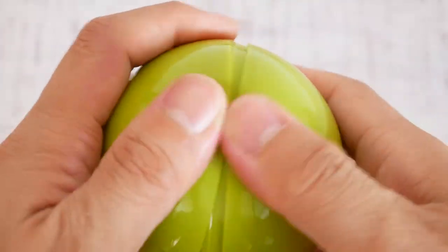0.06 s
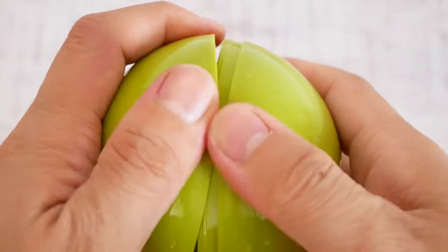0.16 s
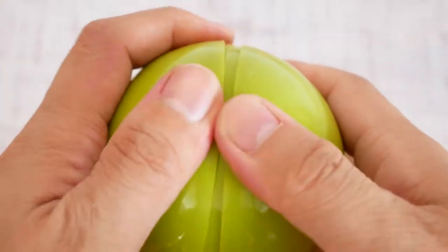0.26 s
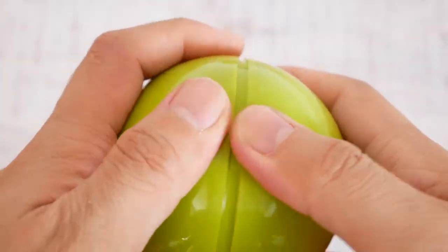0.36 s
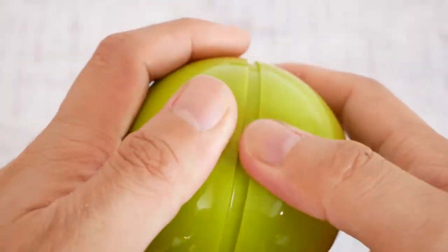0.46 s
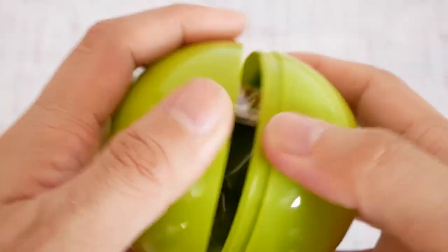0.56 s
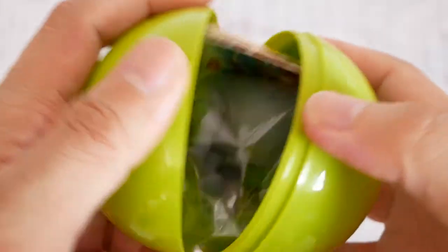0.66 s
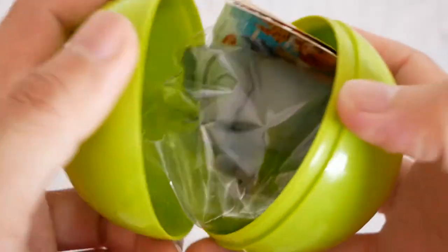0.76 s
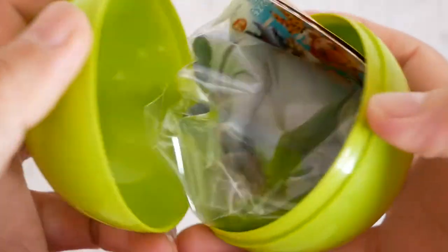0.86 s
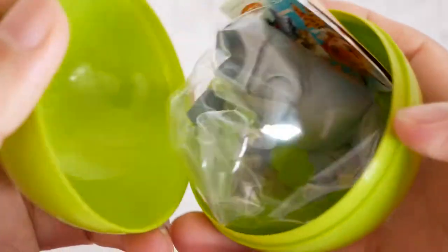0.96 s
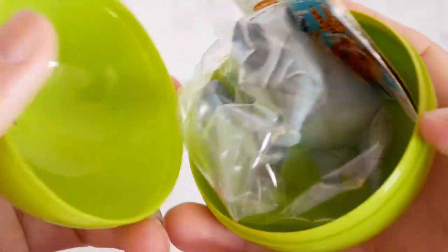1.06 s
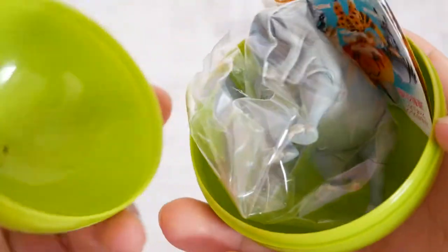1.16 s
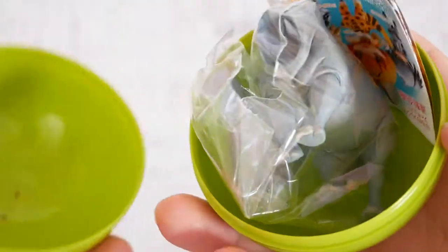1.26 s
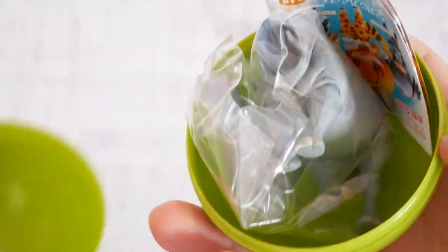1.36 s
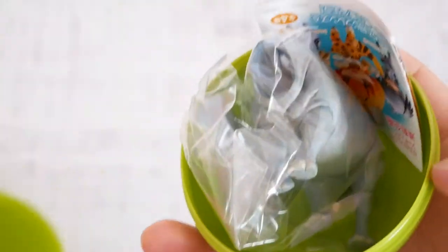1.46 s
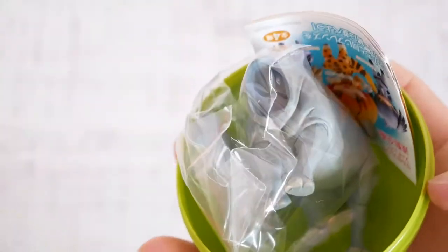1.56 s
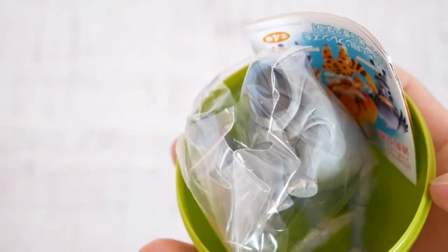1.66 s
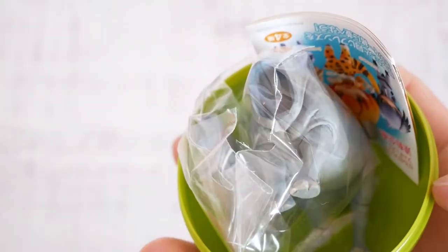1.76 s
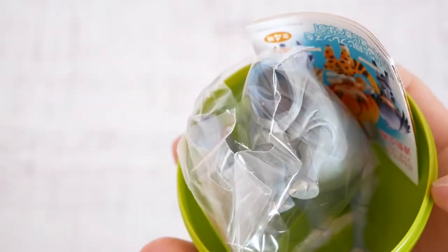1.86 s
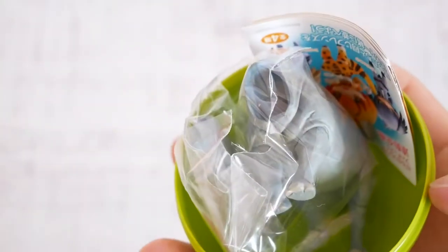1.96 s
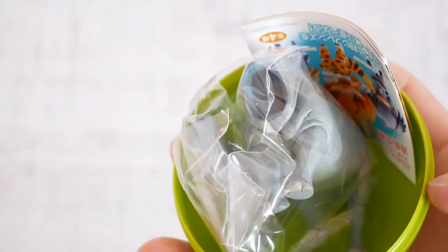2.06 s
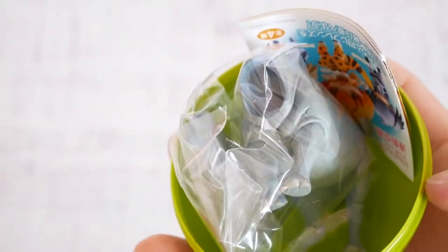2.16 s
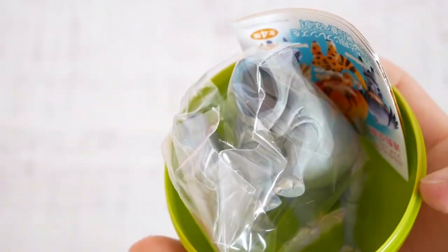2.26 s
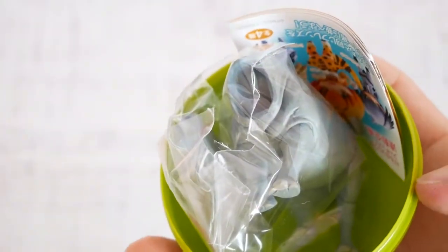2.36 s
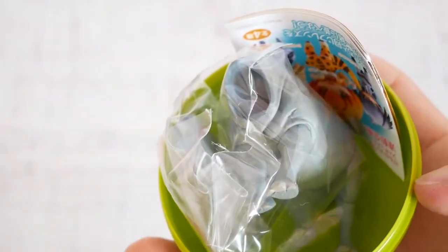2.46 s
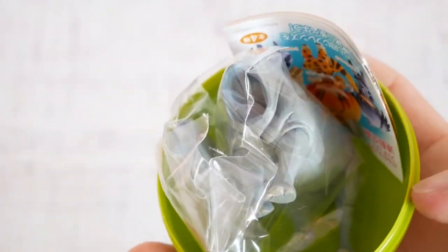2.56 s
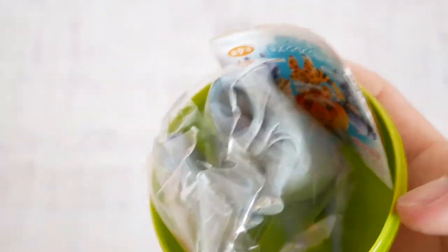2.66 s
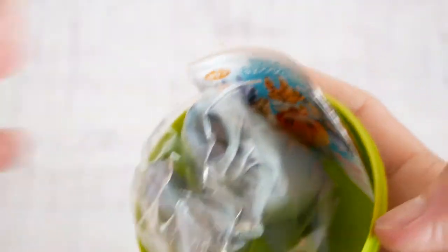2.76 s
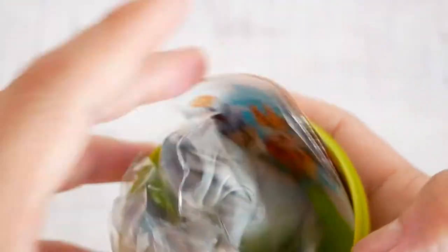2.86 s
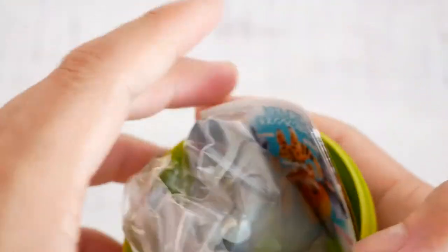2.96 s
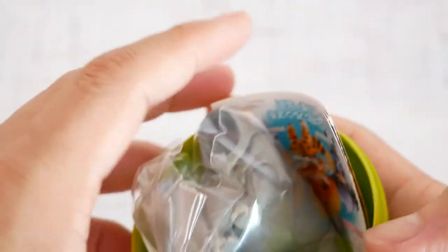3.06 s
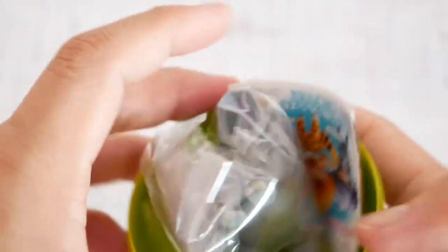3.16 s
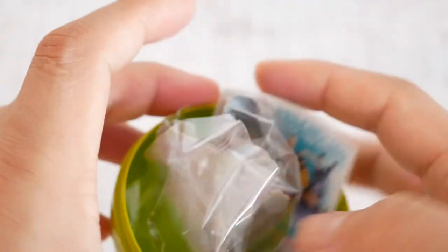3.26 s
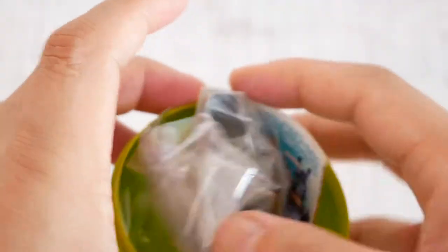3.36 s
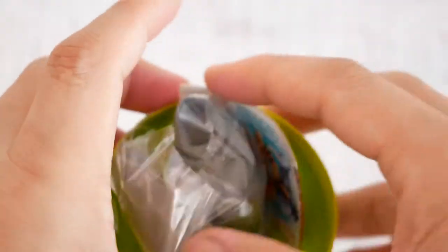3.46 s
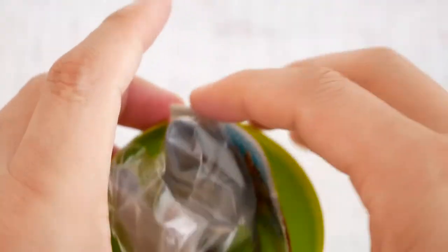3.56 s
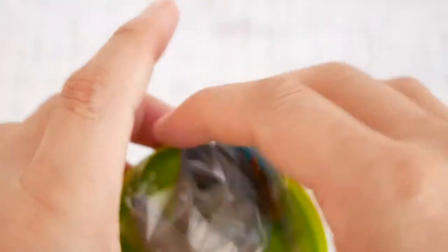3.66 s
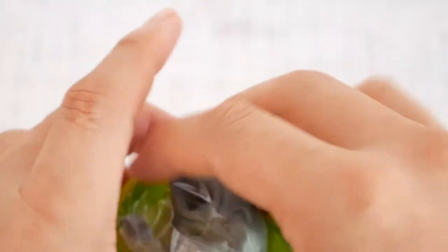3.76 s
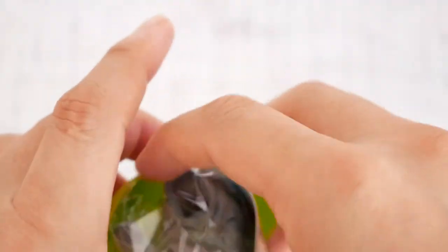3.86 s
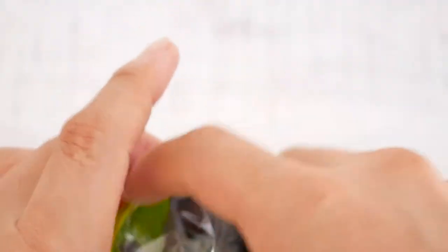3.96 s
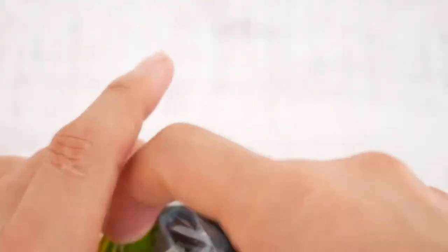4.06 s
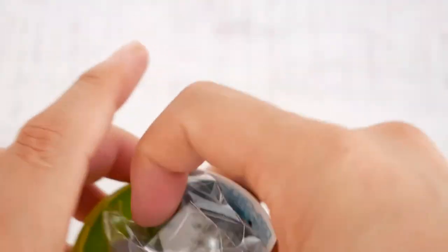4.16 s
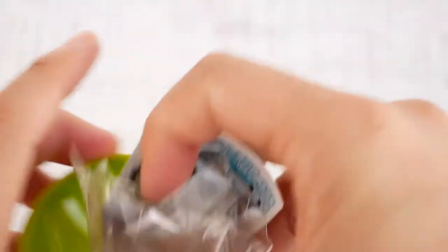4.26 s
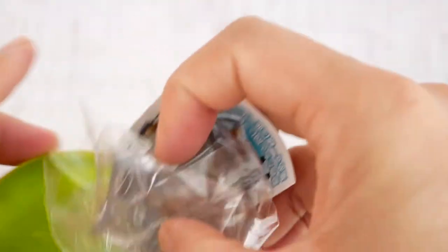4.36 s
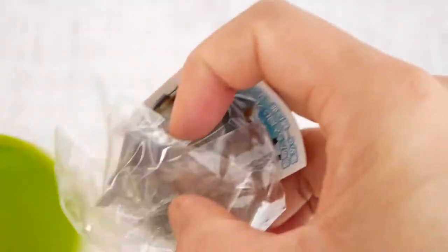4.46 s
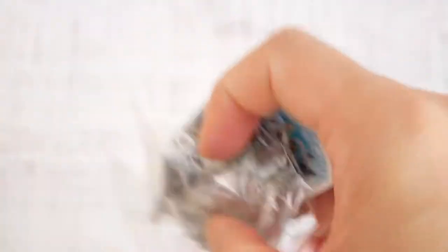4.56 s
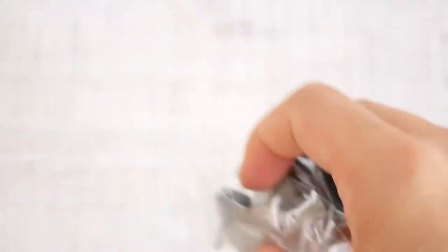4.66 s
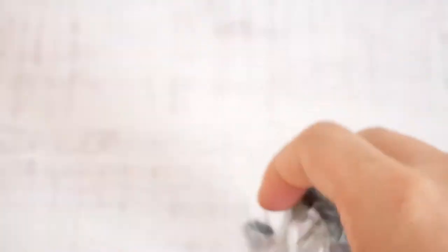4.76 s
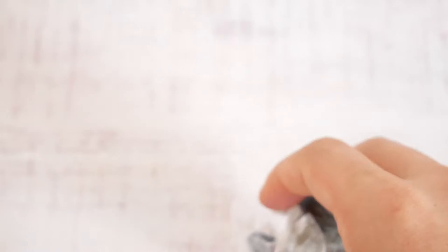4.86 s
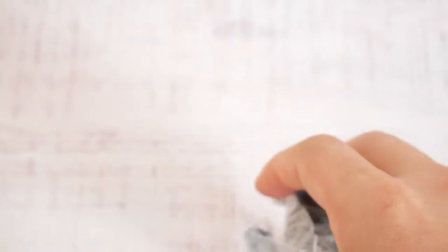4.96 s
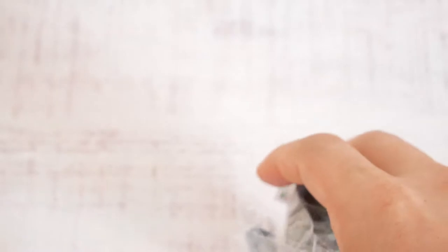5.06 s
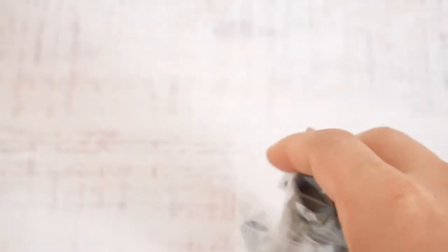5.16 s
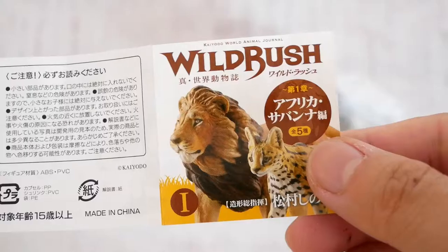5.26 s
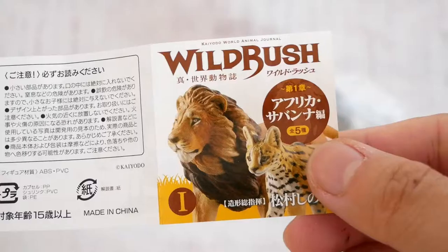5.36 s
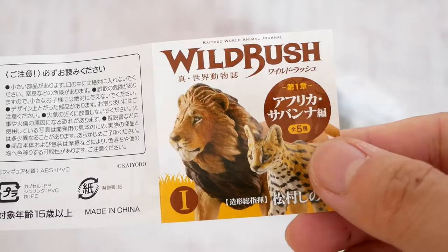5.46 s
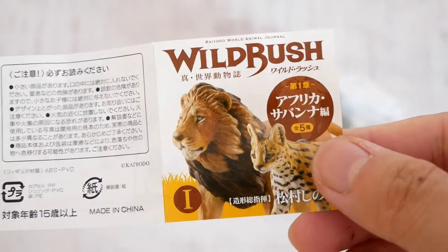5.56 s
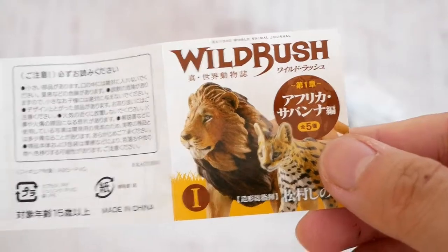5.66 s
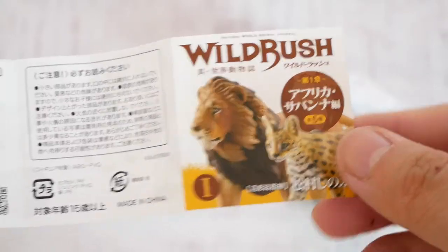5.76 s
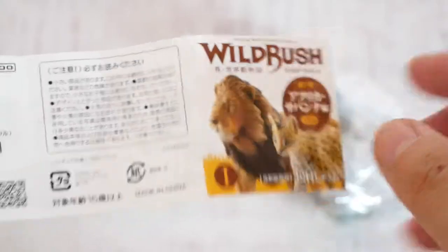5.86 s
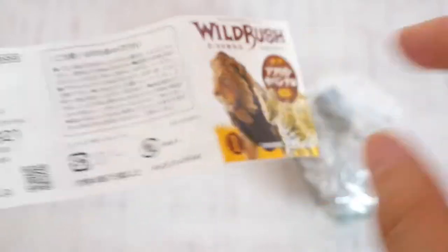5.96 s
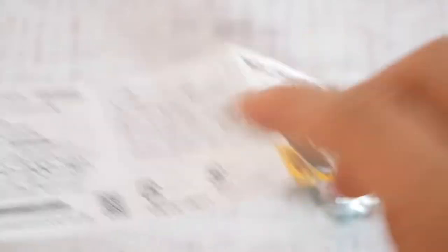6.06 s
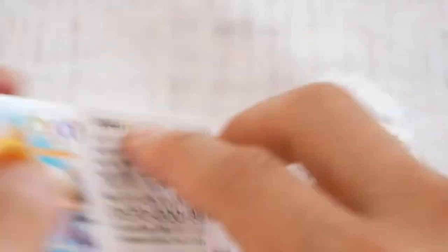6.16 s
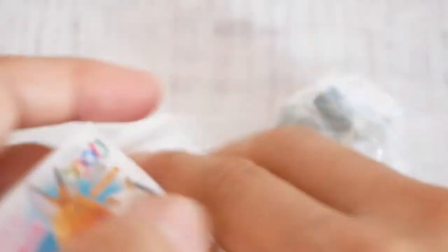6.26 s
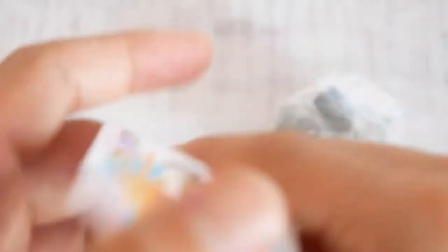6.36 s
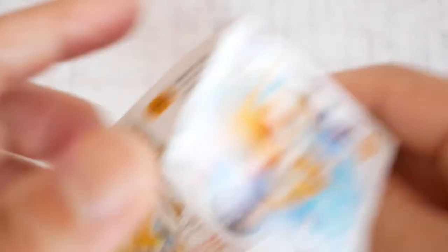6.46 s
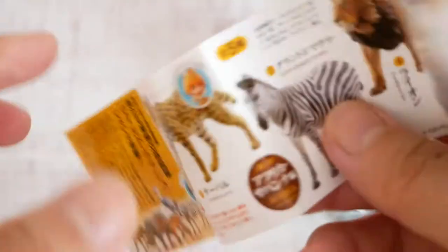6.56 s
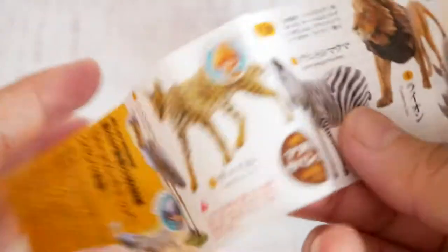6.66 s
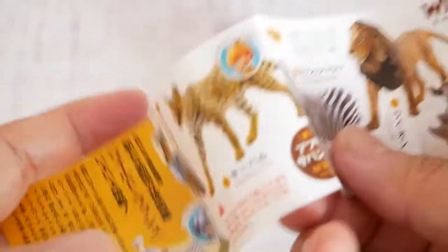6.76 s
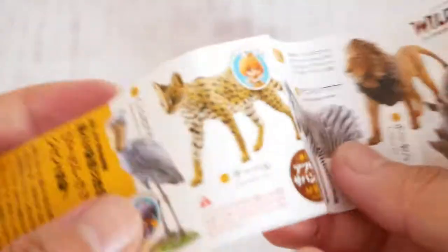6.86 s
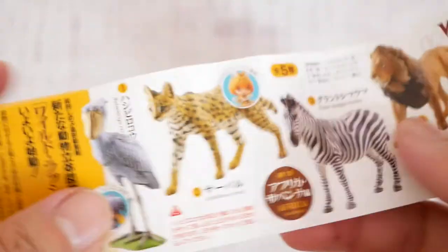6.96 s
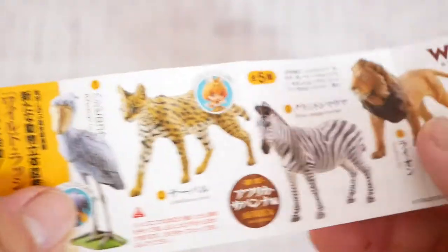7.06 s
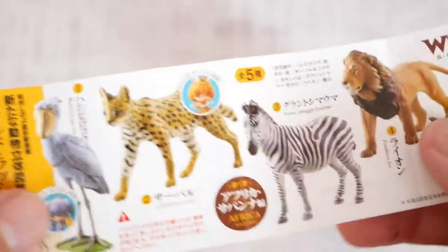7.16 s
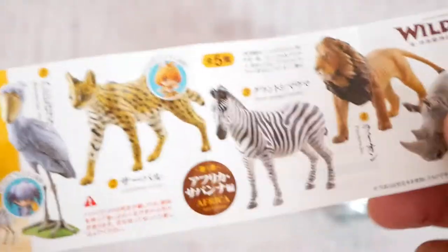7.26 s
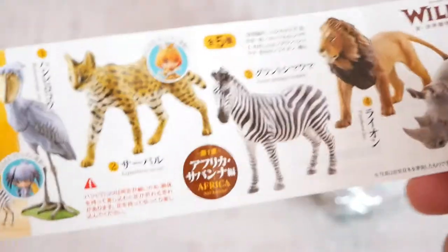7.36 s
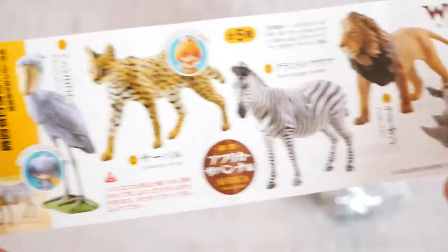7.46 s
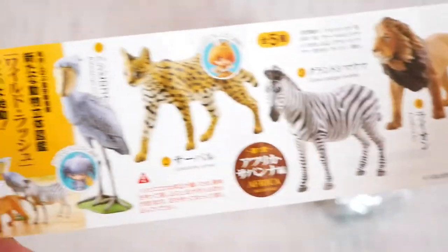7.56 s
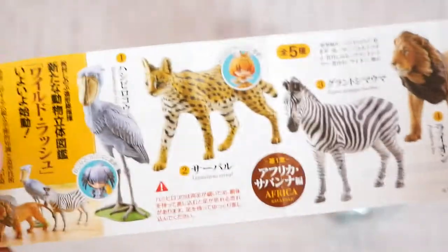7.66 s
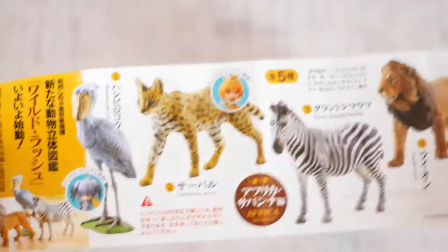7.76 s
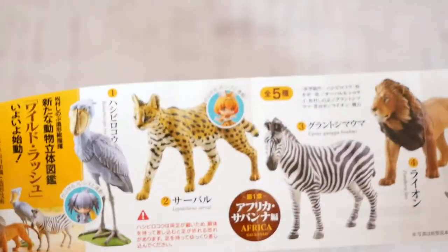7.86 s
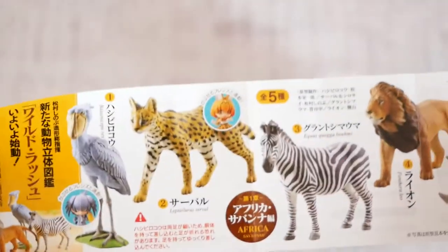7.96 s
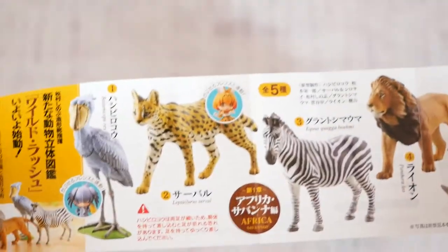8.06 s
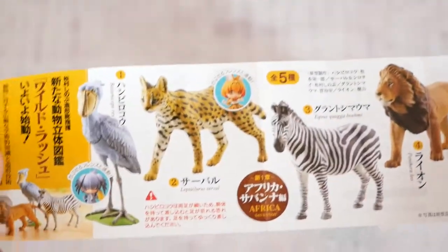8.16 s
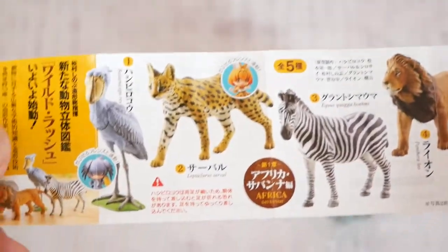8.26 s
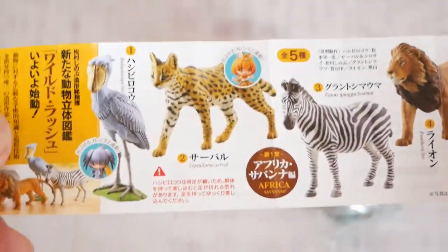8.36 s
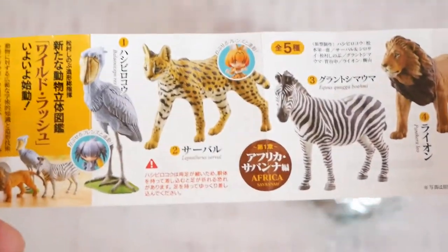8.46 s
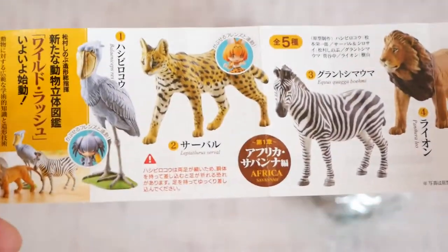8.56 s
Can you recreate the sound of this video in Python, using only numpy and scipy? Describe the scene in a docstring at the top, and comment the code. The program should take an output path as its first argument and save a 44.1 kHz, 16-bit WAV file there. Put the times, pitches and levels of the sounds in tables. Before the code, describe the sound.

Hollow plastic snaps and rattles, sharp bag crinkling that cuts off abruptly, then a glossy leaflet unfolding with crisp snaps in a humming small room.

```python
"""A plastic toy capsule is snapped open over a table and one half is put down, rattling; a hand slides by. A
bagged figure is pulled crinkling out of the other half and dropped; then the scene changes at once, room tail
included. After a short pause a folded paper leaflet is opened. A low hum, rumble and hiss run throughout. Blows
ring table modes, cracks and creases are filtered jolts, and friction is coloured random grains."""
import sys
import numpy as np
from scipy import signal
from scipy.fft import rfft, irfft, next_fast_len
from scipy.io import wavfile

SR = 44100
rng = np.random.default_rng(int(sys.argv[2]) if len(sys.argv) > 2 else 0)


def file_out(sig):
    """Save sig as 16-bit WAV at sys.argv[1]."""
    # one column per channel
    cols = np.atleast_2d(sig).T
    # limit, then scale
    lim = np.clip(cols, -1, 1)
    pcm = np.round(lim * 32767).astype(np.int16)
    wavfile.write(sys.argv[1], SR, pcm)


N = 378819
TIME = np.arange(N) / SR
JOLT_TIME = TIME[:1024]
CAPSULE_END_S = 5.254
CUTOFF_HZ = 15900


def from_db(db):
    """Decibels to amplitude gain."""
    return 10 ** (np.asarray(db) / 20)


def rms_one(x):
    """Scale to rms 1."""
    return x / np.sqrt(np.mean(x ** 2) + 1e-20)


def gain_curve(rows):
    """A (time, dB) curve as gain, silent outside its span."""
    s, db = np.transpose(rows)
    return from_db(np.interp(TIME, s, db)) * (TIME >= s[0]) * (TIME <= s[-1])


def at_hz(points, hz):
    """Read a two-column table along log frequency."""
    table_hz, values = np.array(points).T
    return np.interp(np.log(hz + 1e-3), np.log(table_hz), values)


def colour(x, spectrum):
    """Causal (minimum-phase) filter with the given (Hz, dB) spectrum."""
    size = 2 * next_fast_len(len(x))
    hz = np.arange(size // 2 + 1) * SR / size
    cepstrum = irfft(np.log(from_db(at_hz(spectrum, hz))))
    # fold the cepstrum onto positive time: minimum phase
    cepstrum[1:size // 2] *= 2
    cepstrum[size // 2 + 1:] = 0
    response = np.exp(rfft(cepstrum))
    return irfft(rfft(x, size) * response)[:len(x)]


def resonance(x, hz, width_hz):
    """Two-pole resonance with a peak gain near 1."""
    r = np.exp(-np.pi * width_hz / SR)
    numerator = np.array([1, 0, -1]) * (1 - r * r) / 2
    denominator = [1, -2 * r * np.cos(2 * np.pi * hz / SR), r * r]
    return signal.lfilter(numerator, denominator, x)


def drift(knots_per_s):
    """Slow random curve through evenly spaced knots; rms 1."""
    knots = rng.standard_normal(int(knots_per_s * N / SR) + 2)
    return rms_one(np.interp(TIME * knots_per_s, np.arange(len(knots)), knots))


def add(track, s, sound):
    """Lay a sound into a track at time s."""
    at = int(s * SR)
    track[at:at + len(sound)] += sound[:N - at]


def sized(x, db, seconds):
    """Give a pulse the energy of a sine of this peak level lasting so long."""
    return x * from_db(db) * np.sqrt(seconds * SR / 2 / np.sum(x ** 2))


def jolt(chatter, decay_s):
    """One sudden push and a brief chatter of tiny slips, its spectral ripple partly evened out."""
    push = chatter * rng.standard_normal(len(JOLT_TIME)) * np.exp(-JOLT_TIME / decay_s)
    push[0] = 1
    ripple_db = 20 * np.log10(np.abs(rfft(push))[1:] + .1)
    hz = np.arange(1, len(ripple_db) + 1) * SR / len(push)
    return colour(push, np.column_stack([hz, -.3 * ripple_db]))


def grains(per_s, spread_db, clump_db):
    """Random micro-slips of uneven size that come in clumps; rms 1."""
    sizes = from_db(spread_db * np.minimum(rng.exponential(1, N), 4)) * rng.standard_normal(N)
    occurs = rng.random(N) < per_s / SR
    return rms_one(sizes * occurs * from_db(clump_db * drift(70)))


def crinkle(per_s, low_hz, high_hz, spread_db, clump_db):
    """Tiny wrinkles flip at random, each ringing for a few cycles at one of 12 pitches; rms 1."""
    clicks = grains(per_s, spread_db, clump_db)
    pitches_hz = np.geomspace(low_hz, high_hz, 12)
    dealt = rng.integers(0, len(pitches_hz), N)
    return rms_one(sum(resonance(clicks * (dealt == k), hz, hz / 2) for k, hz in enumerate(pitches_hz)))


def strokes(rows, attack_s, release_s):
    """Each stroke swells, holds and dies away; one gain per dB column, overlaps adding in power."""
    power = 0
    for start, length, *levels_db in rows:
        t = TIME - start
        shape = np.clip(t / attack_s, 0, 1) * np.exp(-np.clip((t - length) / release_s, 0, 20))
        power = power + np.outer(from_db(levels_db), shape) ** 2
    return np.sqrt(power)


def snaps(rows, sheet, body, ring, chatter, seconds, body_trim_db, top_trim_db):
    """A crease buckles: a sharp tick with a pitch of its own, which also shakes a larger body."""
    out = np.zeros(N)
    for s, db, hz, body_db, top_db in rows:
        push = jolt(chatter, 0.0027)
        tick = colour(push + ring * resonance(push, hz, hz / 3), sheet)
        tick = colour(tick, [(700, -5.5), (2500, -1.5), (6500, -3), (12000, top_db + top_trim_db)])
        add(out, s, sized(tick, db, seconds))
        shake = colour(jolt(0.18, 0.00091), body)
        add(out, s, sized(shake, db + body_db + body_trim_db, seconds))
    return out


def background(hum_hz=54.06, hum_trim_db=-0.5, waver_db=4.5, rumble_db=-42, air_db=-45):
    """A low sine wavering in phase and level, plus low-frequency noise and room hiss."""
    # hum level before trim and waver: (time [s], level [dB])
    hum_level = [(0.0, -35.5), (1.1, -34), (1.9, -37), (2.6, -37), (3.5, -39.5), (4.4, -46), (4.7, -38),
                 (5.24, -49), (5.26, -30), (5.6, -27.5), (5.85, -43), (6.2, -39), (6.9, -42), (7.05, -35.5),
                 (7.5, -39), (7.7, -32), (8.59, -32.5)]
    # noise spectra: (frequency [Hz], relative density [dB])
    rumble_spectrum = [(12, -6.5), (25, -0.5), (42, 3), (70, -3), (100, -7), (160, -13), (400, -43.5)]
    air_spectrum = [(41, -31), (70, -10), (86, -27.5), (138, -21.5), (208, -19.5), (321, -22.5), (385, -14),
                    (412, -22), (472, -17), (517, -27.5), (1370, -30.5), (3820, -40), (4690, -38.5),
                    (14600, -58.5), (16000, -77)]
    hum = np.sqrt(2) * np.sin(2 * np.pi * hum_hz * TIME + 0.47 * drift(6.9))
    hum *= gain_curve(hum_level) * from_db(hum_trim_db + waver_db * np.tanh(drift(6.3)))
    rumble = from_db(rumble_db) * rms_one(colour(rng.standard_normal(N), rumble_spectrum))
    air = from_db(air_db) * rms_one(colour(rng.standard_normal(N), air_spectrum))
    return hum + rumble + air


def hand_slide(hiss_trim_db=-1, rub_trim_db=-2):
    """Fine, even friction of skin on the table cover, with a hollow note while the hand presses."""
    # strokes, before trims: (start [s], length [s], hiss level [dB], hollow rub level [dB])
    hand_strokes = [(1.65, 0.1, -43, -37.5), (1.745, 0.14, -40.5, -48), (1.89, 0.1, -48.5, -55),
                    (2.005, 0.025, -39.5, -56), (2.245, 0.067, -40.5, -55), (2.355, 0.031, -42, -63)]
    # spectra of hiss and hollow rub: (frequency [Hz], relative density [dB])
    skin = [(400, -5), (850, -10), (1700, -7.5), (3000, -2.5), (4500, 0.5), (7000, -4.5), (10000, -12),
            (16000, -21)]
    slide_body = [(500, -23), (800, -11), (1020, 0.5), (1330, 9.5), (1600, -5), (2400, -4.5), (5000, -31.5)]
    hiss_gain, rub_gain = strokes(hand_strokes, attack_s=0.012, release_s=0.018)
    friction = grains(14000, spread_db=2.9, clump_db=1)
    hiss = from_db(hiss_trim_db) * hiss_gain * rms_one(colour(friction, skin))
    rub = from_db(rub_trim_db) * rub_gain * rms_one(colour(friction, slide_body))
    return hiss + rub


def leaflet(rub_trim_db=-1):
    """Glossy paper hisses through the fingers; its folds flip over and its panels flap."""
    # paper sliding through the fingers, before trim: (start [s], length [s], level [dB])
    paper_strokes = [(5.64, 0.062, -48.5), (5.8, 0.3, -58), (6.015, 0.043, -43), (6.195, 0.07, -36.5),
                     (6.3, 0.053, -39.5), (6.38, 0.048, -41.5), (6.68, 0.055, -49), (6.78, 0.21, -45.5),
                     (6.945, 0.05, -38.5), (7.0, 0.1, -35.5), (7.12, 0.15, -43), (7.235, 0.14, -38),
                     (7.475, 0.09, -46), (7.715, 0.18, -47.5), (7.94, 0.2, -53), (8.27, 0.025, -53)]
    # panels flapping and pushing air: (time [s], peak level [dB], frequency [Hz])
    puffs = [(6.2305, -17, 860), (6.335, -29, 1200), (6.392, -29, 1010), (6.82, -17.5, 326),
             (7.284, -22, 327), (7.394, -20, 278), (7.797, -23, 630)]
    # folds flipping, last two before trims:
    # (time [s], peak level [dB], ring [Hz], flap re treble [dB], top octave re treble [dB])
    paper_snaps = [(6.191, -15, 2400, 3, -21), (6.209, -15, 4650, -1.5, -19), (6.2301, -4.5, 2860, -4, -54),
                   (6.323, -23.5, 2460, 5.5, -21), (6.7295, -27.5, 3640, 2, -13),
                   (6.745, -22.5, 4300, -21, -30), (6.8197, -13, 3420, 0.5, -38),
                   (7.001, -11.5, 5300, -27, -15), (7.283, -26, 4330, 1, -20),
                   (7.3933, -2.5, 6700, -7, -16.5), (7.796, -29.5, 2170, 5.5, -36),
                   (7.961, -27.5, 2900, 1, -24), (8.019, -29, 2300, 1, -24), (8.047, -34.5, 3780, 8.5, -29)]
    # spectra of sheet and flapping panel: (frequency [Hz], relative density [dB])
    paper = [(250, 6.5), (600, 0), (1200, -6.5), (1850, 2.5), (2700, -4.5), (3700, -0.5), (5400, -1.5),
             (7500, -6.5), (11000, -12.5), (16000, -19)]
    flap = [(60, -41), (150, -14), (300, 0.5), (650, -0.5), (1100, 3), (1400, 4.5), (2000, 4), (4000, -18),
            (9000, -66)]
    fibres = crinkle(11000, 500, 14000, spread_db=2.3, clump_db=1.6)
    rub_gain = strokes(paper_strokes, attack_s=0.012, release_s=0.035)[0]
    out = from_db(rub_trim_db) * rub_gain * rms_one(colour(fibres, paper))
    for s, db, hz in puffs:
        puff = resonance(resonance(jolt(0.0088, 0.0011), hz, hz), hz, hz)
        add(out, s, sized(puff, db, 0.0016))
    return out + snaps(paper_snaps, paper, flap, ring=1.0, chatter=0.22, seconds=0.0005,
                       body_trim_db=0, top_trim_db=11)


def bag(film_trim_db=-3.5, hollow_trim_db=-2):
    """The film crackles as it drags on the capsule, whose open half rings hollow; creases snap."""
    # drags on the capsule, before trims: (start [s], length [s], film level [dB], hollow level [dB])
    bag_drags = [(0.23, 0.17, -52, -53), (0.685, 0.06, -41, -59), (0.75, 0.08, -49.5, -48),
                 (1.14, 0.06, -52, -64), (1.38, 0.12, -51, -60), (2.895, 0.066, -34, -42),
                 (3.18, 0.014, -35, -40.5), (3.3, 0.026, -41.5, -46), (3.39, 0.029, -41.5, -41),
                 (3.525, 0.055, -43.5, -51), (3.62, 0.12, -36.5, -40.5), (3.65, 0.042, -31.5, -29.5),
                 (3.81, 0.037, -32.5, -36.5), (3.86, 0.29, -38.5, -40.5), (4.09, 0.11, -30.5, -32),
                 (4.14, 0.025, -24.5, -29), (4.222, 0.03, -24, -38), (4.335, 0.037, -36, -42),
                 (4.42, 0.19, -56, -52), (4.68, 0.095, -42.5, -53), (4.765, 0.18, -36.5, -50),
                 (4.96, 0.1, -43, -56), (5.085, 0.022, -36, -52), (5.18, 0.08, -38.5, -43)]
    # creases buckling, last two before trims:
    # (time [s], peak level [dB], ring [Hz], capsule hollow re treble [dB], top octave re treble [dB])
    bag_snaps = [(0.6825, -17.5, 3340, -32, -18), (0.6864, -14.5, 5700, -32, -20),
                 (2.9024, -11, 5660, -43, -16), (2.933, -17, 4120, -16, -13), (3.0003, -10, 2780, -9.5, -5),
                 (3.6044, -2, 4060, -18, -23), (3.7928, -17.5, 4790, 2, -38),
                 (3.8736, -17.5, 4770, -22, -8), (3.8889, -16.5, 2500, 1, -33),
                 (3.9891, -22, 3870, 2.5, -38), (4.0613, -12.5, 3160, 2, -16),
                 (4.0701, -1.5, 2800, -5.5, -16), (4.0772, -10, 3670, -3, -20),
                 (4.1299, -7, 5030, -2.5, -17), (4.15, -10, 5530, -3.5, -12), (4.1574, -14, 5780, -2, -22),
                 (4.1703, -4, 2600, -33, -42), (4.2115, -13.5, 2760, -22, -6), (4.2299, -6, 4790, -23, -18),
                 (4.2503, -4.5, 5020, -9.5, -16), (4.2687, -7, 2600, -5, -32), (4.293, -8.5, 6240, -4, -14),
                 (4.381, -9.5, 2580, -29, -16), (4.4034, -7, 4850, -19, -14),
                 (4.4552, -20.5, 3840, 9.5, -28), (4.464, -6.5, 4320, -28, -25),
                 (4.836, -15, 6400, -26, -31), (4.8464, -14, 2770, -25, -40),
                 (4.8657, -13.5, 4440, -19, -16), (4.8886, -13, 4570, -16, -26),
                 (4.9015, -2.5, 4470, -27, -25.5), (5.015, -11.5, 4460, -41, -9),
                 (5.0446, -17.5, 2640, -25.5, -17), (5.0828, -16, 4660, -29, -11),
                 (5.097, -22, 4820, -20, -19), (5.2065, -12.5, 5540, -30, -20)]
    # spectra of film and hollow capsule: (frequency [Hz], relative density [dB])
    film = [(300, -15.5), (800, 0.5), (2000, 0), (3200, -1.5), (4800, 2), (7500, -5.5), (11000, -13.5),
            (16000, -26)]
    hollow = [(300, -17.5), (800, -17), (1100, -14.5), (1300, 0.5), (1460, 5.5), (1700, -5), (2200, -10),
              (4000, -47), (9000, -61)]
    film_gain, hollow_gain = strokes(bag_drags, attack_s=0.013, release_s=0.019)
    wrinkles = crinkle(3000, 1000, 14000, spread_db=4.1, clump_db=2.5)
    crackle = from_db(film_trim_db) * film_gain * rms_one(colour(wrinkles, film))
    slips = grains(1500, spread_db=1.9, clump_db=1.5)
    scrape = from_db(hollow_trim_db) * hollow_gain * rms_one(colour(slips, hollow))
    return crackle + scrape + snaps(bag_snaps, film, hollow, ring=1.6, chatter=0.29, seconds=0.00053,
                                    body_trim_db=6.5, top_trim_db=19)


def bounces(gap_s=0.0115, gap_spread=0.205, thud_fade_db_per_s=234, clack_fade_db_per_s=138):
    """Blows of things rattling to rest: unevenly spaced, the thud fading faster than the clack."""
    # (first bounce [s], length [s], thud level [dB], thud centre [Hz], clack level [dB], clack [Hz])
    rattles = [(2.1202, 0.085, -15, 594, -11, 1040), (5.163, 0.078, -15, 760, -9.5, 910)]
    blows = []
    for start, length, thud_db, thud_hz, clack_db, clack_hz in rattles:
        gaps = gap_s * (1 + gap_spread * rng.uniform(-1, 1, size=12))
        for t in np.cumsum(gaps) - gaps[0]:
            if t < length:
                faded_thud_db = thud_db - thud_fade_db_per_s * t
                faded_clack_db = clack_db - clack_fade_db_per_s * t
                blows.append((start + t, faded_thud_db, thud_hz, faded_clack_db, clack_hz))
    return blows


def knocks(thud_trim_db=-6, reach=0.43, clack_width=0.88):
    """Each blow is a hollow plastic clack and rings the table modes nearest its thud centre."""
    # blows on the table top, thud before trim:
    # (time [s], thud level [dB], thud centre [Hz], clack level [dB], clack [Hz])
    blows = [(0.069, -22, 200, -27, 1300), (0.0729, -4, 189, -9.5, 1150), (0.0821, -10, 264, -5.5, 1350),
             (0.0912, -15, 200, -24, 800), (0.107, -41, 260, -9, 920), (0.285, -35, 330, -24, 766),
             (0.335, -27, 300, -31, 700), (0.402, -25.5, 262, -44, 600), (0.62, -41, 700, -30.5, 900),
             (0.745, -34, 704, -31, 805), (1.6563, -48, 900, -20.5, 1350), (2.1016, -25, 230, -2, 1140),
             (2.108, -16.5, 140, -17, 1400), (2.1373, -13, 270, -17, 1000), (2.46, -20.5, 324, -35, 550),
             (2.674, -27.5, 257, -55, 500), (2.926, -25, 353, -46, 500), (3.144, -24, 271, -50, 500),
             (3.674, -34, 420, -21, 950), (3.686, -36, 700, -21, 965), (3.742, -25.5, 285, -50, 500),
             (3.823, -32, 400, -19, 1050), (3.974, -49, 520, -20.5, 714), (4.8769, -6.5, 185, -3, 1210),
             (4.886, -18, 300, -17, 646), (4.913, -14.5, 430, -38, 700), (5.1542, -6, 292, 1.5, 960)]
    # table-top modes: (frequency [Hz], relative level [dB], t60 [s])
    table_modes = [(140, 1.5, 0.18), (208.5, 3, 0.15), (243.9, 0.5, 0.29), (281.5, 0, 0.15),
                   (348, 2.5, 0.19), (392.7, -0.5, 0.3), (446, 1, 0.076), (500, -4, 0.46),
                   (589, -3.5, 0.21), (688.4, -1.5, 0.26), (800, -3, 0.13), (850, -2, 0.065),
                   (1016, -4, 0.28), (1240, -22, 0.18)]
    out, t = np.zeros(N), TIME[:SR // 3]
    hz, mode_db, t60 = np.transpose(table_modes)
    rings = np.sin(2 * np.pi * hz[:, None] * t) * from_db(-60 * t / t60[:, None])
    signs = (-1) ** np.arange(len(hz))
    for s, thud_db, centre_hz, clack_db, clack_hz in [*blows, *bounces()]:
        nearness = np.exp(-.5 * (np.log(hz / centre_hz) / reach) ** 2)
        weight = from_db(mode_db + rng.normal(0, 1, len(hz))) * nearness
        thud = (weight / np.linalg.norm(weight) * signs) @ rings
        add(out, s, from_db(thud_db + thud_trim_db) * thud)
        clack = resonance(jolt(0.12, 0.0054), clack_hz, clack_hz * clack_width)
        clack = colour(clack, [(200, 16.0), (1450, -1.0), (2100, -7.0), (3300, -12.5), (6000, -9), (15000, -34)])
        add(out, s, sized(clack, clack_db, 0.0012))
    return out


def shell_cracks(trim_db=-2, ring_width_hz=1300, broad=0.14):
    """The stiff rim jumps over its catch and rings briefly."""
    # cracks of shell and rim, before trim: (time [s], peak level [dB], ring [Hz])
    cracks = [(0.0741, -19, 4500), (0.0823, -11, 4460), (0.083, -11.5, 2800), (0.092, -18, 4970),
              (0.095, -13.5, 4700), (0.1065, -15, 4640), (0.109, -9, 4900), (0.111, -19, 4900),
              (0.284, -30, 4000), (0.997, -36, 4500), (1.468, -29, 5100), (1.481, -30.5, 5030),
              (1.494, -31, 5000), (1.656, -27, 2930), (2.102, -18.5, 5000), (2.122, -23, 4940),
              (5.1537, -8.5, 4670), (5.159, -17, 4900), (5.165, -22, 4800)]
    out = np.zeros(N)
    for s, db, hz in cracks:
        push = jolt(0.13, 0.0036)
        broadband = colour(push, [(300, -28), (1500, -6), (3000, -2), (6000, -8), (15000, -14)])
        crack = resonance(push, hz, ring_width_hz) + broad * broadband
        crack = colour(crack, [(5500, 3.5), (8000, -4.5), (15000, -3.5)])
        add(out, s, sized(crack, db + trim_db, 0.001))
    return out


def even(noise):
    """Noise with its spectrum levelled, so that it has no colour of its own."""
    spectrum = rfft(noise)
    return irfft(spectrum / (np.abs(spectrum) + 1e-12), len(noise))


def room(x, wet_db=-5, build_s=0.0013):
    """Direct sound and the small room's diffuse tail, dying band by band."""
    # reverberation time: (frequency [Hz], t60 [s])
    room_t60 = [(150, 0.39), (600, 0.33), (2000, 0.19), (5000, 0.35), (9000, 0.1), (15000, 0.29)]
    t, edges_hz = TIME[:SR // 2], np.geomspace(90, 18000, 9)
    diffuse = np.concatenate([even(block) for block in rng.standard_normal((25, len(t) // 25))])
    tail = 0
    for low, high in zip(edges_hz, edges_hz[1:]):
        band_filter = signal.butter(2, [low, high], "band", fs=SR, output="sos")
        band = signal.sosfiltfilt(band_filter, diffuse)
        tail = tail + band * from_db(-60 * t / at_hz(room_t60, np.sqrt(low * high)))
    build = np.clip(t / build_s, 0, 1) ** 2
    tail = from_db(wet_db) * rms_one(tail * build) / np.sqrt(len(t))
    tail = colour(tail, [(200, -7.0), (600, -2), (2000, -1.5), (5000, -1.0), (14000, 2.5)])
    return x + signal.fftconvolve(x, tail)[:N]


def scene():
    """Unpacking, cut off with its tail where the scene changes, then the leaflet; both channels are the same."""
    unpacking = room(knocks() + shell_cracks() + bag() + hand_slide()) * (TIME < CAPSULE_END_S)
    mono = unpacking + room(leaflet()) + background()
    return np.array([mono, mono])


def record(dry):
    """Peaks beyond full scale are flattened, then a steep low-pass cuts the top."""
    low_pass = signal.ellip(12, .1, 100, CUTOFF_HZ, fs=SR, output="sos")
    return signal.sosfilt(low_pass, np.clip(dry, -1, 1))


dry = scene()
out = record(dry)
file_out(out)
```